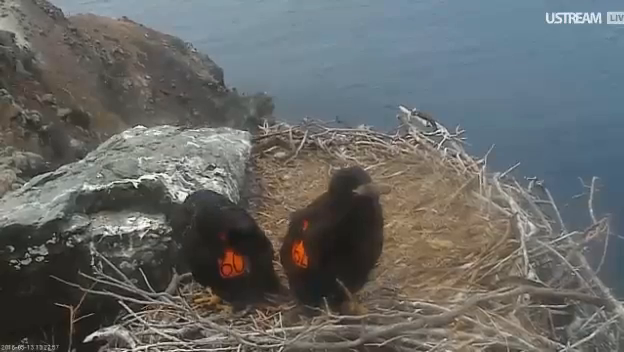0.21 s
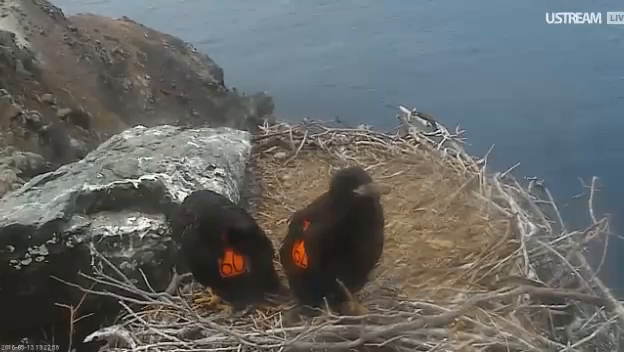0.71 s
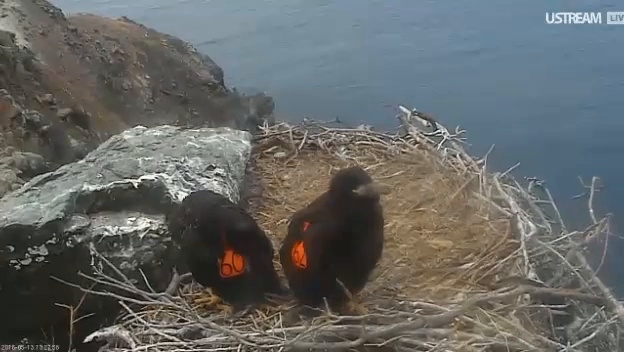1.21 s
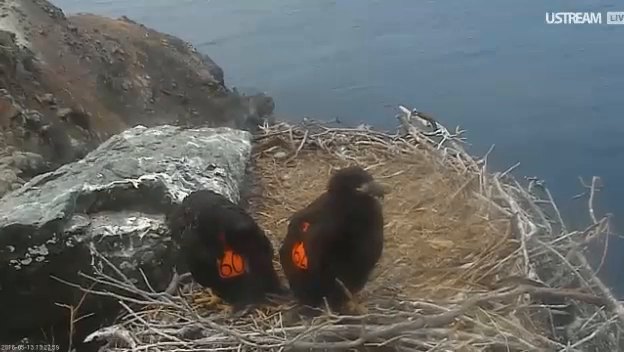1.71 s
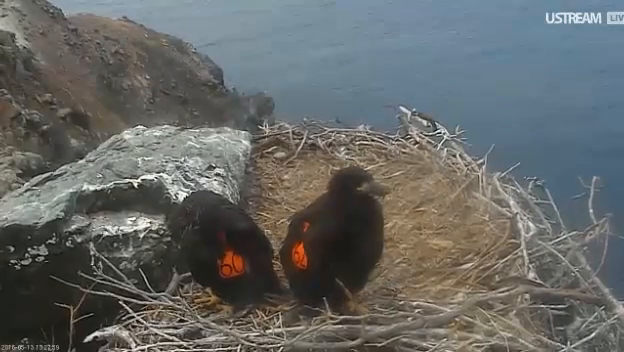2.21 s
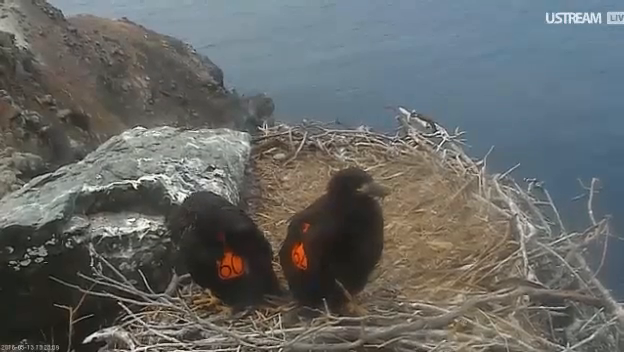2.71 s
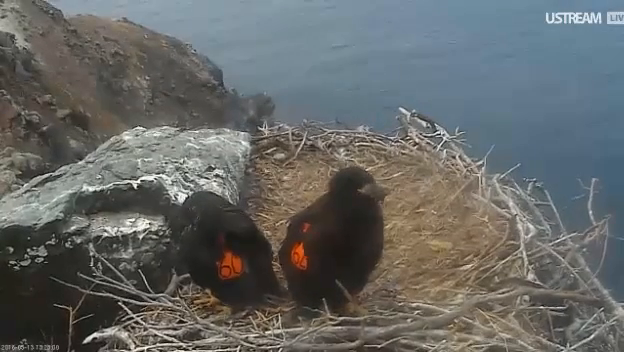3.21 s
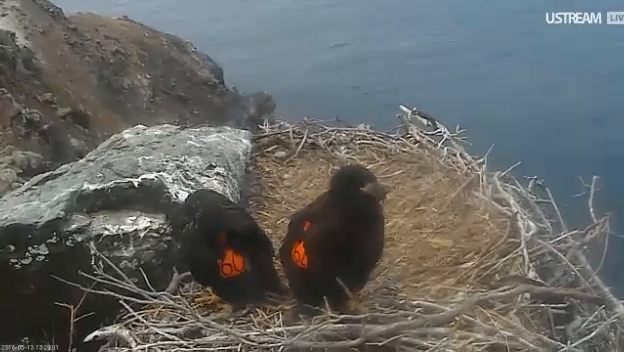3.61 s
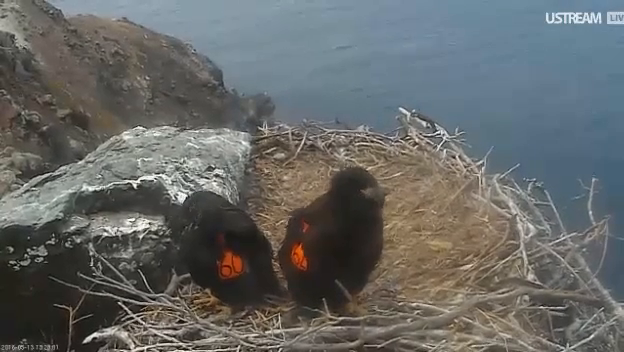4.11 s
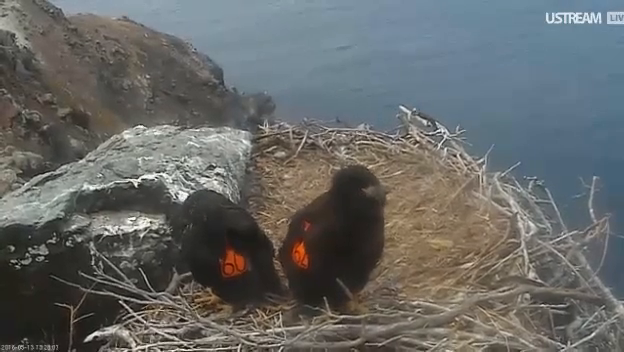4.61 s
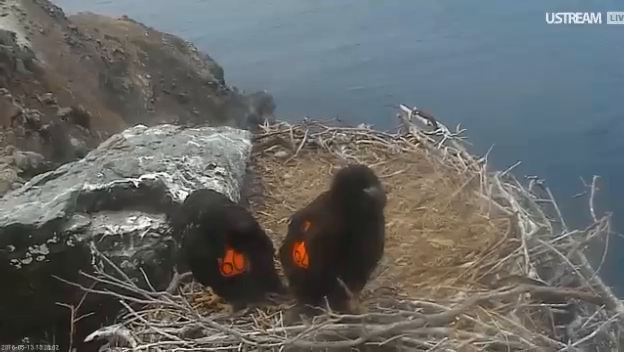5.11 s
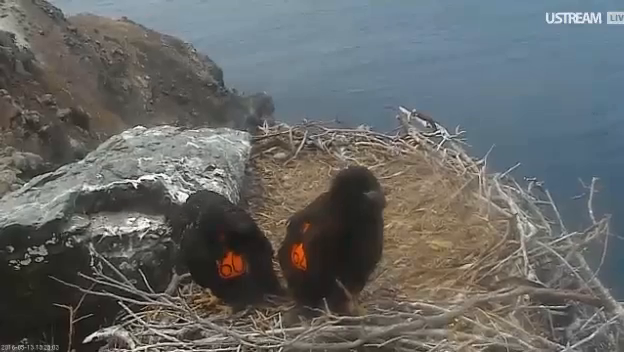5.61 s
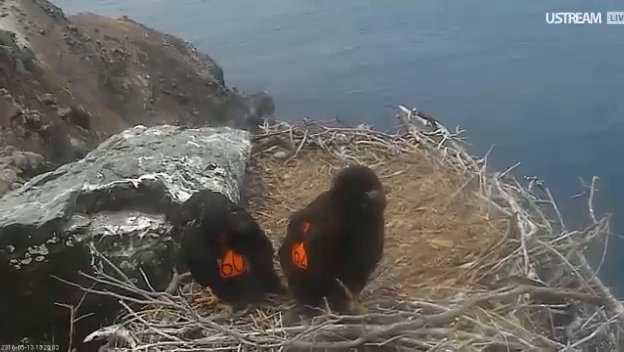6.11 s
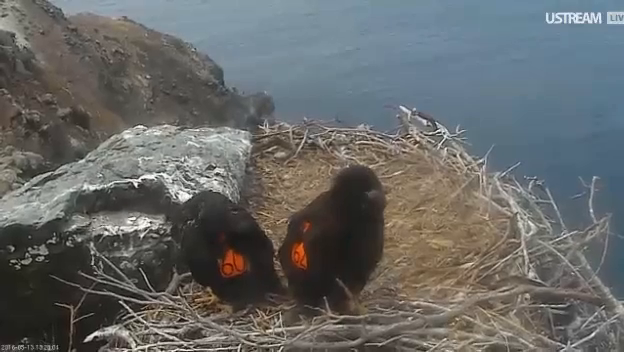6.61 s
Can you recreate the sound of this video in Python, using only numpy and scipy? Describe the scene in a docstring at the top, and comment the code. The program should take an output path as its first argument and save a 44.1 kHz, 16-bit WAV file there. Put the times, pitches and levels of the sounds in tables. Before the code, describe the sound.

A soft, even hiss of open air, distant sea and microphone noise runs throughout at a clifftop nest. Sharp electrical crackles cut in, seemingly from a fault in the microphone line: first a dense sputter with a faint sizzle, then a lone crackle, a few scattered ticks, a thicker burst and a final quick rasp, with only hiss between them.

```python
"""An outdoor camera microphone over an eagles' nest gives a steady hiss of air, sea and preamplifier.
From 0.25 s to 0.6 s it crackles densely, most likely from a fault in its line, which spits needle-like
spikes of nearly one height, down and up in turn: alone they tick, in fast runs they rasp.
A faint sizzle clings to the runs. Brief crackles break the hiss at 1.8 s and from 3.2 s to 3.8 s;
a thicker cluster follows at 4.5 s, and one last rasp at 5.9 s."""
import sys
import numpy as np
from scipy import signal
from scipy.fft import rfft, irfft
from scipy.io import wavfile
from scipy.ndimage import uniform_filter1d

SR = 44100
rng = np.random.default_rng(int(sys.argv[2]) if len(sys.argv) > 2 else 0)


def dump_mix(stems):
    """Bounce the given channels to the path in sys.argv[1] as a 16-bit WAV at rate SR."""
    frames = np.atleast_2d(stems).T  # one column per channel
    limited = np.clip(frames, -1, 1)  # hard clip at full scale
    pcm = np.round(limited * 32767).astype(np.int16)
    wavfile.write(sys.argv[1], SR, pcm)


N = 303849

# spectrum of the steady background: (frequency [Hz], relative level [dB])
HISS_SPECTRUM = [(20, 2.5), (35, -7.5), (60, -6.5), (140, -10.5), (300, -13.5), (640, -18), (1130, -21),
                 (2700, -25.5), (5000, -29), (9700, -32.5), (10400, -32.5), (10900, -62)]
# spectrum of the sizzle: (frequency [Hz], relative level [dB])
SIZZLE_SPECTRUM = [(100, -11.5), (1000, -3), (1800, -3), (2600, 0.5), (3600, -6), (7000, -7), (10000, -9),
                   (11000, -20.5)]
# spectrum of the dull tail after a run: (frequency [Hz], relative level [dB])
TAIL_SPECTRUM = [(100, 0), (800, -2.5), (1800, 1.5), (2600, 2), (3300, -10.5), (6000, -24.5), (11000, -35)]
# sizzles too weak to set off a spike: (time [s], length [ms], level [dB])
LONE_SIZZLES = [(0.293, 4.4, -50), (0.5353, 8, -50.5), (0.557, 15, -51.5), (0.5823, 4.2, -46.5),
                (0.62, 4.6, -56), (4.563, 8.3, -54.5)]
# response of the line to one spike: (frequency [Hz], gain [dB])
LINE_RESPONSE = [(20, -1.5), (1000, -4), (2000, -5), (4000, -8.5), (6000, -9), (8000, -10), (9700, -9.5),
                 (10400, -14.5), (11000, -31)]
# lone downward spikes: (time [s])
TICK_TIMES = [0.4407, 1.7995, 3.1552, 3.5286, 3.7187, 3.7222, 4.5597, 5.8895, 5.8933]
# runs of spikes: (time [s], length [ms], nominal rate of down-up cycles [Hz])
RUNS = [(0.2455, 1.02, 2010), (0.2537, 0.29, 1700), (0.2576, 3.03, 1500), (0.279, 2.02, 1010),
        (0.2839, 1.57, 1700), (0.4283, 0.47, 2170), (0.477, 9.1, 3220), (0.4886, 12.7, 2632),
        (0.5029, 5.6, 1680), (0.5156, 3.74, 2600), (0.5254, 2.85, 2600), (0.547, 1.0, 2550),
        (0.5639, 0.6, 2420), (0.5743, 3.4, 2363), (0.5894, 1.8, 848), (0.594, 12.3, 1021),
        (1.7913, 1.0, 2060), (1.7947, 3.86, 2410), (3.157, 0.08, 3000), (3.1596, 1.6, 950),
        (3.1654, 0.43, 3400), (3.2149, 6.4, 3130), (3.5337, 1.71, 2450), (3.785, 1.9, 2610),
        (3.8044, 1.27, 2100), (3.8179, 0.33, 2700), (4.5174, 8.3, 2876), (4.529, 10.05, 2194),
        (4.5433, 3.5, 2212), (4.5499, 7.2, 1700), (5.8808, 7.4, 2047)]


def undb(db):
    """Amplitude grows tenfold with every 20 dB."""
    return 10 ** (np.asarray(db) / 20)


def colour(x, points):
    """Zero-phase filtering: a real gain curve weights the spectrum without delay."""
    hz, db = np.transpose(points)
    bins = np.maximum(np.arange(N // 2 + 1) * SR / N, 1)
    return irfft(rfft(x) * undb(np.interp(np.log(bins), np.log(hz), db)), N)


def noise(spectrum):
    """White noise takes on the spectrum of its filter; scaled to rms 1."""
    x = colour(rng.standard_normal(N), spectrum)
    return x / np.std(x)


def drift(rate_hz):
    """Moving averages smooth random steps into a slow fluctuation of unit spread."""
    hold = int(SR / rate_hz)
    steps = np.repeat(rng.standard_normal(N // hold + 1), hold)
    smooth = uniform_filter1d(uniform_filter1d(steps, hold), hold)[:N]
    return smooth / np.std(smooth)


def gate(start, length_ms, rise_ms, fall_ms):
    """An envelope of 1 during an event, with exponential rise before it and decay after it."""
    t_ms = 1000 * (np.arange(N) / SR - start)
    time_constants = np.maximum(-t_ms / rise_ms, (t_ms - length_ms) / fall_ms)
    return np.exp(-np.clip(time_constants, 0, 20))


def impulses(times, heights, half_width=8):
    """Band-limited interpolation: a windowed sinc lets an impulse fall between samples."""
    index = (times * SR).astype(int)[:, None] + np.arange(1 - half_width, half_width + 1)
    offset = index - times[:, None] * SR
    shape = np.sinc(offset) * np.sinc(offset / half_width)
    return np.bincount(index.ravel(), (heights[:, None] * shape).ravel(), N)[:N]


def hiss(level_db=-61.5, waver_db=-0.43):
    """Distant air, sea and preamplifier merge into one nearly stationary broadband noise."""
    return noise(HISS_SPECTRUM) * undb(level_db + waver_db * drift(rate_hz=5))


def sizzle(around_db=-46, tail_db=-57):
    """Amplitude-modulated noise fries alone or around runs over 1 ms, which leave a dull tail."""
    spans = [(start, ms) for start, ms, _ in RUNS if ms > 1]
    around = np.max([gate(start, ms, rise_ms=1.2, fall_ms=3) for start, ms in spans], axis=0)
    alone = sum(undb(db) * gate(start, ms, rise_ms=0.4, fall_ms=0.9) for start, ms, db in LONE_SIZZLES)
    tail = np.max([gate(start, ms, rise_ms=0.55, fall_ms=18) for start, ms in spans], axis=0)
    frying = (undb(around_db) * around + alone) * noise(SIZZLE_SPECTRUM)
    return frying + undb(tail_db) * tail * noise(TAIL_SPECTRUM)


def spike_run(start, length_ms, hz, ragged_hz=1150, steady_hz=3000, natural_hz=2550, max_spikes=256):
    """Timing jitter in a bipolar pulse train: fast, regular runs buzz; slow, irregular ones sputter."""
    count = int(np.clip(round(2 * hz * (length_ms / 1000)) + 1, 2, max_spikes))
    down = np.arange(count) % 2 == 0
    jitter = np.interp(hz, [ragged_hz, steady_hz], [0.45, 0.089])  # log ratio
    down_share = np.interp(hz, [ragged_hz, steady_hz], [0.38, 0.22])  # part of a cycle from down to up
    stumble = np.clip(rng.standard_t(3, max_spikes)[:count - 1], -5, 5)
    stall, unevenness = rng.standard_normal((max_spikes, 2))[:count].T
    slowing = 0.03 * np.linspace(0, 1, count - 1)
    waits = np.where(down[:-1], down_share, 1 - down_share) * np.exp(jitter * stumble + slowing)
    # a slow run keeps near the natural pace and spends its spare time in a few long pauses
    spare = max(natural_hz / hz - 1, 0) * waits.sum()
    pause_weights = waits ** 2 * np.exp(2.2 * stall[:-1])
    waits = waits + spare * pause_weights / pause_weights.sum()
    progress = np.append(0, np.cumsum(waits)) / waits.sum()
    # close pairs cancel in the bass and sound thin; an unpaired or unequal spike adds a pop
    heights = np.where(down, -undb(0.5), undb(0.48)) * undb(0.5 * unevenness)
    return start + length_ms / 1000 * progress, heights


def crackle(tick_db=0.75):
    """Each spike, alone or in a run, is rounded into the impulse response of the narrow-band line."""
    times, heights = np.hstack([spike_run(*run) for run in RUNS])
    ticks = impulses(np.array(TICK_TIMES), np.full(len(TICK_TIMES), -undb(tick_db)))
    return colour(impulses(times, heights) + ticks, LINE_RESPONSE)


def scene():
    """Superposition: crackle, sizzle and hiss add in one microphone channel."""
    return (crackle() + sizzle() + hiss())[None]


def record(dry):
    """Band limiting: the camera acts as a low-pass filter."""
    low_pass = signal.firwin(63, cutoff=11289, fs=SR)
    return signal.fftconvolve(dry, low_pass[None], mode="same")


dry = scene()
out = record(dry)
dump_mix(out)
```